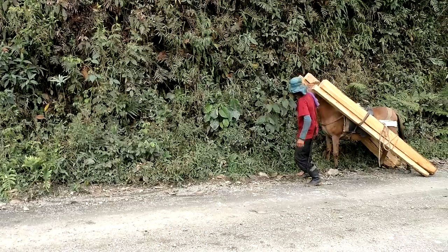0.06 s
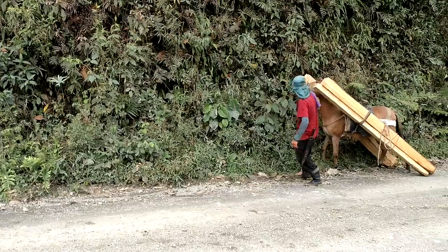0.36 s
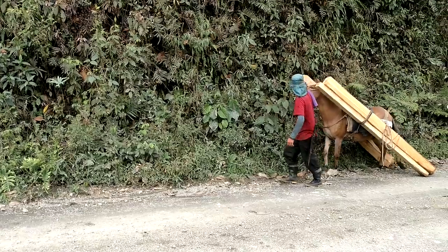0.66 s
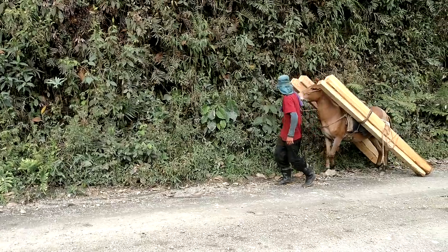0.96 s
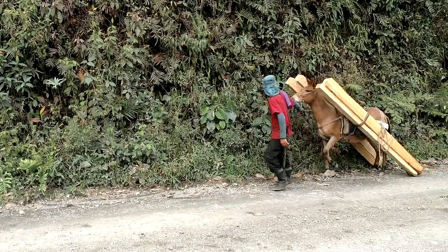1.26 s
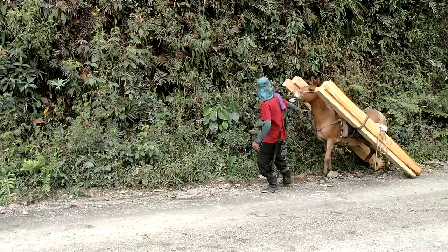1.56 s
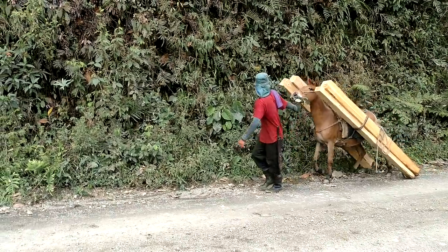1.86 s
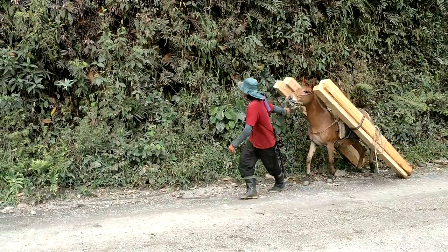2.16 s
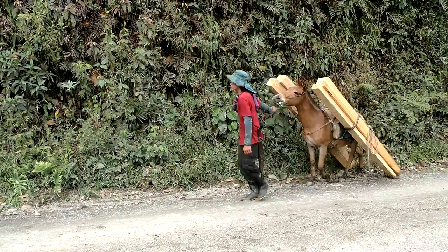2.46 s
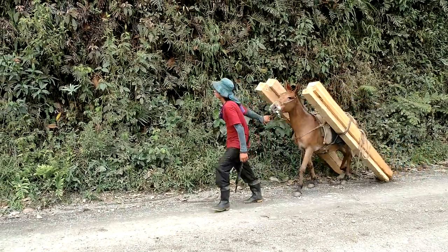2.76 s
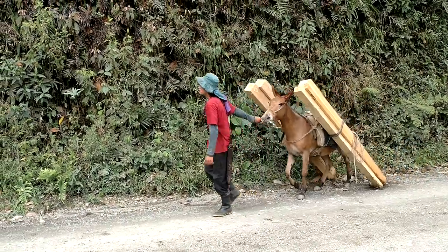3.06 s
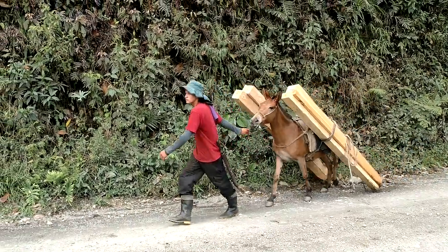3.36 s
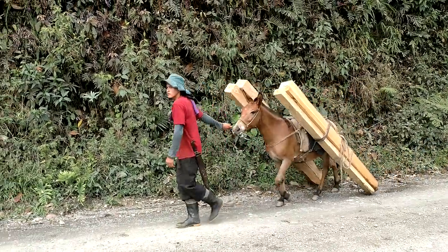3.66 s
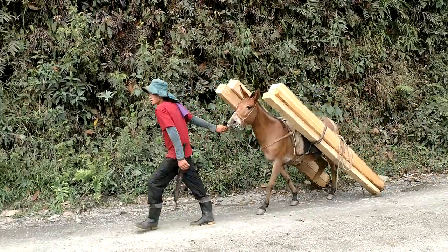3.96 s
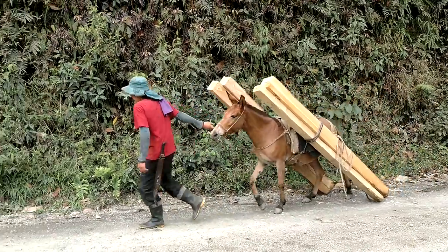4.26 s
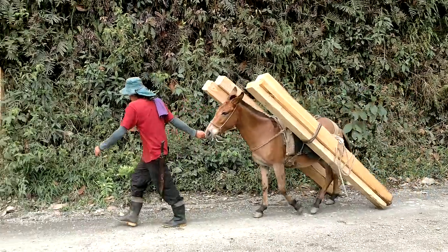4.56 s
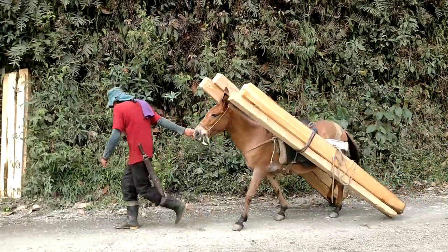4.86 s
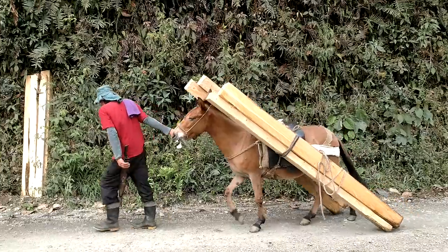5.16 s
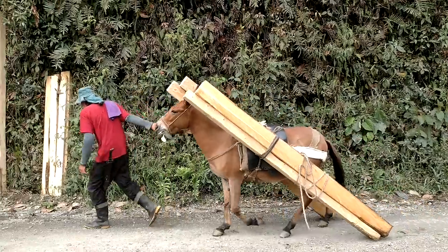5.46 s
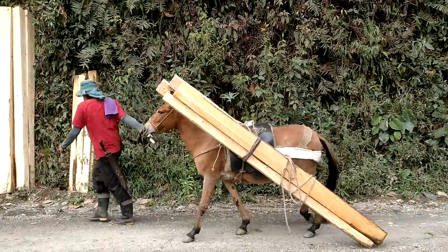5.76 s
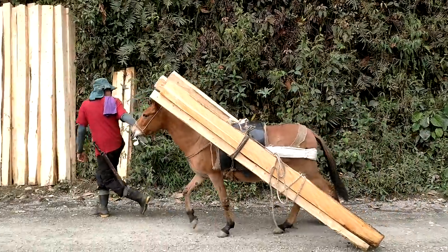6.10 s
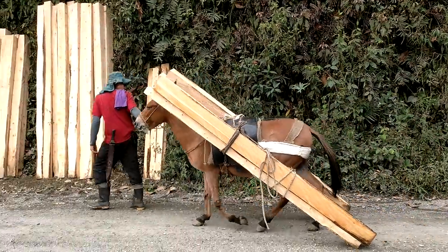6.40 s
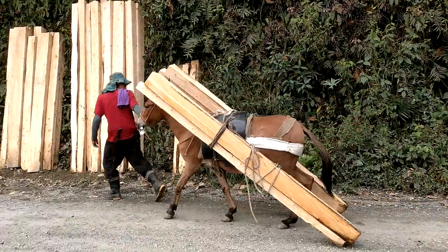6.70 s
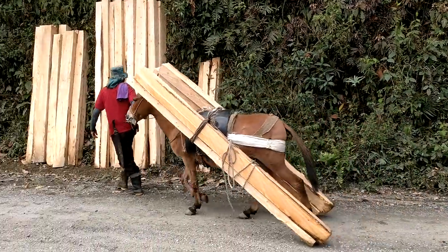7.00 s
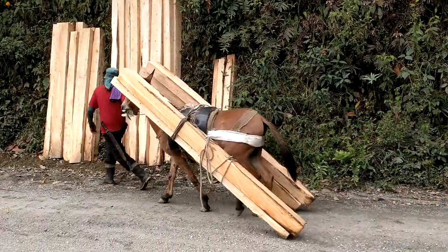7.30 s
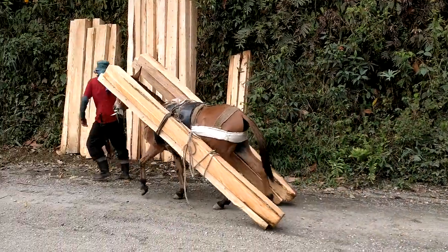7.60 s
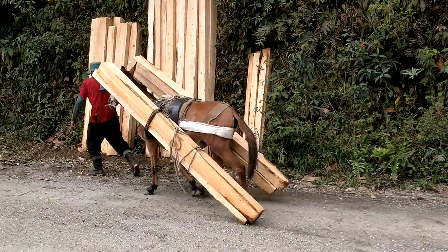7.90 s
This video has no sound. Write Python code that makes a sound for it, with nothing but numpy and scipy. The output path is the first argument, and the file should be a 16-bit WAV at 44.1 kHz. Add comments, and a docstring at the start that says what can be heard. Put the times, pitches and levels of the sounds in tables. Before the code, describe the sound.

Hooves and boots crunch on a gravel road as dragged timber scrapes past in surges, knocking hollowly, with low wind gusts.

```python
"""On a gravel road a mule, led by a man in boots, drags long sawn boards past at close range.
Friction is a train of tiny impacts: the board ends grind over the stones in surges, while hooves,
boots and lurching boards crunch and knock. Each blow excites the modes of the timber, which rings
hollowly. Turbulent gusts buffet the microphones."""
import sys
import numpy as np
from scipy import signal
from scipy.fft import rfft, irfft, next_fast_len
from scipy.io import wavfile
from scipy.ndimage import uniform_filter1d, map_coordinates

SR = 44100
rng = np.random.default_rng(int(sys.argv[2]) if len(sys.argv) > 2 else 0)


def wav_record(signal):
    """Record a signal, one row per channel, as 16-bit PCM in the file named by sys.argv[1]."""
    frames = np.transpose(np.atleast_2d(signal))
    bounded = np.clip(frames, -1, 1)
    # unit amplitude maps onto the largest positive 16-bit level
    quanta = np.round(bounded * 32767).astype(np.int16)
    wavfile.write(sys.argv[1], SR, quanta)


N = 358974

# modes of the lashed boards: frequency_hz, level_db, t60_s
BOARD_MODES = [(175.4, -5.5, 0.27), (314.6, 0, 0.17), (439.5, -6.5, 0.18), (614.4, 1.5, 0.08),
               (699.7, 1.5, 0.12), (792, -3, 0.059), (967, -5, 0.073), (1035.6, -0.5, 0.082),
               (1182, 4.5, 0.048), (1323, 9.5, 0.03), (1438, 7, 0.039), (1880, -1.5, 0.044)]
# spectrum of a hard knock on wood: frequency_hz, gain_db
KNOCK_SPECTRUM = [(100, -18.5), (300, -12.5), (520, -11), (700, -3.5), (1050, 6.5), (1420, 6.5), (1750, -2),
                  (2300, -5), (3300, -15), (6000, -67.5)]
# spectrum of stone striking stone: frequency_hz, gain_db
GRIT_SPECTRUM = [(400, -7), (1500, 5.5), (2600, 3), (3200, 5.5), (4050, 4), (5000, 0.5), (6000, -2.5),
                 (7700, -8), (10500, -1.5), (15500, -6.5)]
# approach of the load, which turns side-on as it nears: time_s, nearness_fraction
NEARNESS = [(0, 0.86), (3.2, 0.64), (5, 1), (6.3, 1)]


def drag(patches=48):
    """Friction as many small impacts: board ends plough through stones, which hiss and shake the wood."""
    # spectrum of wood grinding on gravel: frequency_hz, gain_db
    grind_spectrum = [(100, -19), (310, -4), (500, -7), (700, -3), (1050, 8), (1420, 3), (2300, -3.5),
                      (3300, -10.5), (6000, -59.5)]
    # fine sand under the boards, relative to the grit: time_s, level_db
    sand_levels = [(0, 6), (.5, -4), (1.3, -3), (2.7, 2), (4.8, -13), (8.1, -13.5)]
    grind_gain, grit_gain = hauling()
    sand_db, = curves(sand_levels)
    coarseness = np.clip(0.65 + 0.55 * curves(NEARNESS)[0], 0, 1.2)  # single stones stand out up close
    clumps = amp(1.8 * wobble(45, N)) * fractures(N, rate=45) ** coarseness
    contacts = stones(N, rate=800, spread_db=3.5, sand=0.75) * clumps
    wood, cracks = np.zeros(N), np.zeros((2, N))
    edges = np.linspace(0, N, patches + 1).astype(int)
    for start, end in zip(edges, edges[1:]):  # the point of contact keeps shifting
        patch = np.pad(contacts[:, start:end], ((0, 0), (0, SR // 4)))
        add(wood, start / SR, unit(through(patch[0], timber()), slice(end - start)))
        add(cracks, start / SR, unit(scatter(patch), slice(end - start)))
    grind = unit(through(wood, kernel(grind_spectrum)))
    grit = unit(through(cracks, kernel(GRIT_SPECTRUM)))
    grains = stones(N, rate=2800, spread_db=5.5, sand=1.0) * amp(2.0 * wobble(24.67, N))
    hiss = unit(through(grains, kernel([(2000, 9.9), (6000, 0.87), (9500, 6.1), (15500, 2.7)])))
    return grind_gain * grind, grit_gain * (grit + amp(sand_db) * hiss)


def hauling(creep_grind_db=0.5):
    """Friction noise follows the sliding: each pull lifts the grind and grit gains above a slow creep."""
    # surges of the mule: start_s, length_s, grind_db, grit_db
    pulls = [(0.457, 0.53, -47, -43.5), (0.914, 0.36, -39, -42.5), (1.468, 0.4, -35, -40.5),
             (2.088, 0.38, -36, -43.5), (2.468, 0.37, -38, -42.5), (3.004, 0.26, -36, -42),
             (3.557, 0.38, -41.5, -44.5), (4.028, 0.08, -37, -40.5), (4.22, 0.23, -41.5, -45),
             (4.8, 0.059, -37, -36.5), (5.197, 0.018, -26.5, -29.5), (5.362, 0.28, -35.5, -42.5),
             (5.742, 0.087, -31.5, -35.5), (5.974, 0.384, -33, -38.5), (6.38, 0.37, -40.5, -46),
             (7.172, 0.05, -34, -39), (7.233, 0.21, -31, -38), (7.495, 0.2, -34, -38.5),
             (7.79, 0.16, -44.5, -46.5), (8.076, 0.087, -30.5, -36)]
    # creeping boards and trickling stones between pulls: time_s, grit_db
    creep_levels = [(0, -52.5), (2, -43), (3.5, -47), (4.7, -52), (6.5, -53.5), (8.14, -53.5)]
    creep = amp(curves(creep_levels)[0])
    grind, grit = creep * amp(creep_grind_db), creep
    for start, length, grind_db, grit_db in pulls:
        pull = swell(start, length, attack_s=0.0096, release_s=0.056)
        grind = np.maximum(grind, amp(grind_db) * pull)
        grit = np.maximum(grit, amp(grit_db) * pull)
    return grind, grit


def stones(n, rate, spread_db, sand):
    """Shot noise: uneven impacts, rate per second, over sand; two channels share their times and sizes."""
    hits = rng.random(n) < rate / SR
    sizes = amp(spread_db * np.minimum(rng.exponential(size=n), 4))
    signs = rng.choice([-1, 1], (2, n))
    return unit(hits * sizes * signs) + sand * rng.standard_normal((2, n))


def fractures(n, rate, t60=0.015):
    """Brittle fracture: a stone gives way at random, and the gain of the contacts flares and decays."""
    flares = (rng.random(n) < rate / SR) * np.minimum(rng.exponential(size=n), 1.5)
    return 1 + 2 * through(flares, amp(-60 * np.arange(SR // 20) / SR / t60))


def timber(rattle_db=9, rattle_t60=0.058, direct=10, detune=0.022):
    """Modal impulse response: each contact weights and detunes the modes anew, over a dense rattle."""
    t = np.arange(SR // 4) / SR
    hz, db, t60 = np.transpose(BOARD_MODES)[:, :, None]
    hz = hz * (1 + detune * np.minimum(hz / 1000, 1) * rng.standard_normal(hz.shape))
    strength = amp(db + 2.9 * rng.standard_normal(hz.shape)) * rng.choice([-1, 1], hz.shape)
    ring = np.sum(strength * amp(-60 * t / t60) * np.sin(2 * np.pi * hz * t), axis=0)
    rattle = rng.standard_normal(len(t)) * amp(-60 * t / rattle_t60)
    rattle[0] += direct
    return ring + 4 * amp(rattle_db) * rattle


def contact(hz, db, half_width_octaves=0.39):
    """Contact resonance: the point of impact boosts a broad band around its own pitch."""
    ratio = 2 ** half_width_octaves
    return kernel([(hz / ratio, 0), (hz, db), (hz * ratio, 0)])


def scatter(x, t60=0.018, wet=0.6):
    """Scattering off the road and the load gives each crack a brief diffuse tail."""
    t = np.arange(SR // 16) / SR
    tail = rng.standard_normal(len(t)) * amp(-60 * t / t60)
    return x + wet * through(x, tail / np.linalg.norm(tail))


def stone_resonances(x, depth_db, frame=256):
    """Every stone has its own natural frequency, so the spectrum changes from moment to moment."""
    spectra = signal.stft(x, nperseg=frame)[2]
    ripple = uniform_filter1d(rng.standard_normal(spectra.shape[1:]), size=5, axis=0)
    ripple = uniform_filter1d(ripple, size=4, axis=1)
    coloured = signal.istft(spectra * amp(depth_db * unit(ripple)), nperseg=frame)[1][:, :N]
    return coloured * np.std(x) / np.std(coloured)


def crunches(snap_s=0.0032, settle_db=-24, settle_t60=0.21, grit_lead_s=0.002):
    """Granular collapse: stones yield ever harder under a weight, the wood thuds, loose grit settles."""
    # steps and lurches of the load: peak_s, rise_s, thump_db, knock_db, grit_db, pitch_hz
    impacts = [(1.213, 0.004, -71, -28, -41, 1120), (1.296, 0.0094, -64, -26, -32.5, 1100),
               (1.331, 0.037, -47, -19, -24.5, 1130), (1.836, 0.021, -44, -20.5, -33, 1000),
               (1.955, 0.022, -30.5, -28, -34, 1020), (2.211, 0.0062, -60, -23, -36, 1040),
               (2.224, 0.0029, -56, -26.5, -34.5, 1010), (2.416, 0.0063, -45, -34.5, -30.5, 1060),
               (3.255, 0.01, -40, -20, -29.5, 1340), (3.568, 0.014, -22, -22, -32.5, 1300),
               (3.794, 0.025, -31.5, -27.5, -33.5, 1110), (3.888, 0.0047, -53, -28.5, -34.5, 1090),
               (3.908, 0.0036, -33, -25.5, -38, 1000), (3.922, 0.0098, -24, -31, -46, 970),
               (4.082, 0.0032, -41, -27, -42, 1320), (4.252, 0.0086, -30, -31.5, -34, 1410),
               (4.267, 0.021, -26.5, -26, -39, 1450), (4.298, 0.026, -26, -22.5, -32.5, 1370),
               (4.81, 0.018, -40, -33, -37, 1240), (4.967, 0.018, -31.5, -23, -26, 1030),
               (5.224, 0.022, -35, -24.5, -27, 975), (5.396, 0.0088, -70, -27, -38.5, 1680),
               (5.441, 0.019, -62, -28, -28, 1390), (5.52, 0.062, -56, -27.5, -31, 810),
               (5.653, 0.012, -38, -23.5, -34, 755), (5.821, 0.01, -52, -29, -28.5, 715),
               (5.97, 0.0037, -54, -25.5, -37, 1350), (6.001, 0.045, -34, -28.5, -31, 1390),
               (6.211, 0.018, -56, -25, -31.5, 1120), (6.319, 0.011, -54, -20.5, -32, 1290),
               (6.337, 0.012, -35, -16, -24.5, 1200), (6.359, 0.0037, -54, -17.5, -24, 1350),
               (6.475, 0.014, -58, -17, -25, 1210), (6.662, 0.017, -70, -22, -35.5, 1180),
               (7.01, 0.023, -31.5, -27, -30, 810), (7.592, 0.0067, -40, -18.5, -33.5, 1420),
               (7.682, 0.047, -38.5, -26.5, -57, 1470), (7.912, 0.016, -37.5, -18.5, -23.5, 1410)]
    # spectrum of a heavy thump: frequency_hz, gain_db
    thump_spectrum = [(60, -36), (160, -8), (310, -3.5), (520, -5.5), (850, 0), (1150, 3), (1550, -18),
                      (2200, -45)]
    wood, grit = np.zeros(N), np.zeros((2, N))
    t = np.arange(-SR // 10, SR // 4) / SR
    core = (t > -0.015) & (t < 0.025)
    heavy, hard, gritty = kernel(thump_spectrum), kernel(KNOCK_SPECTRUM), kernel(GRIT_SPECTRUM)
    for peak_s, rise_s, thump_db, knock_db, grit_db, pitch_hz in impacts:
        fall_s = snap_s + 0.59 * rise_s
        force = amp(-11 * np.where(t < 0, np.abs(t / rise_s) ** 1.69, t / fall_s))
        force += (t > 0) * amp(settle_db - 60 * np.abs(t) / settle_t60)
        force *= fractures(len(t), rate=100) ** 0.73
        contacts = force * stones(len(t), rate=2400, spread_db=3.5, sand=0.19)
        contacts[:, np.searchsorted(t, 0)] += 2 + 0.026 / rise_s  # a faster landing stops harder
        ring = through(contacts[0], timber(rattle_db=9.5, rattle_t60=0.061))
        thump = amp(thump_db) * unit(through(ring, heavy), core)
        knock = amp(knock_db) * unit(through(through(ring, hard), contact(pitch_hz, db=7)), core)
        add(wood, peak_s + t[0], thump + knock)
        split = 1 + 0.59 * (t >= 0) * np.exp(-np.abs(t) / snap_s)  # a stone splits as the wood lands
        crunch = unit(through(scatter(split * contacts), gritty), core)
        add(grit, peak_s + t[0] - grit_lead_s, amp(grit_db) * crunch)
    return wood, grit


def pebbles(crack_t60=0.006, tap_hz=1037):
    """Impulsive excitation: a lone stone cracks free and taps the wood."""
    # stones flicked against the boards: start_s, knock_db, grit_db
    flicks = [(0.124, -49, -48), (0.535, -39.5, -51), (0.724, -49.5, -45), (1.049, -35, -40.5),
              (1.468, -37.5, -42), (1.685, -30.5, -45), (1.759, -31, -42.5), (2.348, -31, -56),
              (2.496, -32.5, -55), (2.562, -36.5, -43), (3.163, -39.5, -36), (3.644, -33.5, -36),
              (3.994, -42, -40), (4.389, -39, -44), (4.403, -30, -46), (4.605, -46, -36.5),
              (4.779, -46, -47), (4.842, -46, -44), (5.045, -40.5, -50), (5.068, -41.5, -50),
              (5.581, -34, -42), (5.845, -33.5, -48), (6.596, -35.5, -44.5), (6.797, -41.5, -56),
              (6.927, -31.5, -44), (7.367, -38, -53), (7.411, -34.5, -38), (7.732, -36.5, -68),
              (7.752, -37, -60), (7.846, -39.5, -62)]
    wood, grit = np.zeros(N), np.zeros((2, N))
    t = np.arange(SR // 5) / SR
    core = slice(SR // 25)
    hard = kernel(KNOCK_SPECTRUM)
    gritty = through(kernel(GRIT_SPECTRUM), contact(hz=11200, db=7.5))  # small stones snap higher
    for start_s, knock_db, grit_db in flicks:
        crack = stones(len(t), rate=3300, spread_db=7, sand=0.19) * amp(-60 * t / crack_t60)
        tap = through(through(crack[0], timber(rattle_db=11.0, rattle_t60=0.035)), hard)
        add(wood, start_s, amp(knock_db) * unit(through(tap, contact(tap_hz, db=5.0)), core))
        add(grit, start_s, amp(grit_db) * unit(through(scatter(crack, wet=0.68), gritty), core))
    return wood, grit


def slam(start_s=4.609, level_db=-16, bounce_s=0.0052, loss_db=6, count=5):
    """Inelastic bouncing: one board drops flat on the others and chatters, and the bundle rings on."""
    # spectrum of the blunt blow: frequency_hz, gain_db
    blow_spectrum = [(100, -15), (330, 3), (1300, 1), (1750, -13), (2500, -37)]
    track, blows = np.zeros(N), np.zeros(SR // 4)
    for k, late in enumerate(rng.random(count)):
        add(blows, bounce_s * (k + late / 2) * (k > 0), amp([-loss_db * k]))
    ring = through(blows, timber(rattle_db=1, rattle_t60=0.11, direct=26))
    ring = through(ring, kernel(blow_spectrum))
    add(track, start_s, amp(level_db) * unit(ring, slice(SR // 25)))
    return track


def booms(attack_s=0.023, t60=0.14):
    """Resonance: a soft push from the swaying load swells the strongest low mode of the boards."""
    # sways of the load: start_s, peak_db
    sways = [(3.919, -22), (5.531, -23.5), (5.984, -23.5), (7.234, -31.5)]
    track, t = np.zeros(N), np.arange(SR // 4) / SR
    hz = BOARD_MODES[1][0]
    envelope = np.minimum(t / attack_s, 1) * amp(-60 * np.maximum(t - attack_s, 0) / t60)
    for start_s, peak_db in sways:
        phase = 2 * np.pi * hz * t + 0.41 * wobble(69, len(t))
        add(track, start_s, amp(peak_db) * envelope * np.sin(phase))
    return track


def turning(wood):
    """Directivity: the timber's spectrum changes as its side swings toward the microphones."""
    # radiation ahead of the load: frequency_hz, gain_db
    ahead = [(650, -0.5), (1050, 3), (1550, -9.5), (2100, 9.5), (3400, -28)]
    # radiation to the side: frequency_hz, gain_db
    abeam = [(700, 6), (1050, -3), (1500, -2), (3000, 6.5)]
    near = np.clip(curves(NEARNESS)[0], 0, 1)
    return (1 - near) * through(wood, kernel(ahead)) + near * through(wood, kernel(abeam))


def wind(eddy_db=3.5, flutter_db=-12, flutter_growth=1.23, right_db=-1.3, incoherent_db=-25):
    """Turbulent pressure drives the two channels in antiphase; harder gusts carry more flutter."""
    # spectrum of the low buffeting: frequency_hz, gain_db
    buffet_spectrum = [(25, -27), (65, 0), (110, 2), (180, -9.5), (260, -17), (400, -28.5), (1500, -59)]
    # spectrum of the higher flutter: frequency_hz, gain_db
    flutter_spectrum = [(50, -26), (130, 7), (230, 0), (450, -15.5), (1500, -71)]
    db = wind_db()
    eddies = amp(eddy_db * wobble(24, N))
    rumble = unit(eddies * through(rng.standard_normal((2, N)), kernel(buffet_spectrum)))
    puffs = amp(3.0 * wobble(40, N))
    flutter = unit(eddies * puffs * through(rng.standard_normal(N), kernel(flutter_spectrum)))
    flutter *= amp(db.max() + flutter_db + flutter_growth * (db - db.max()))
    push = amp(db - 4) * rumble[0]
    slap = eddy_slaps()
    left = push + flutter + slap
    right = -amp(right_db) * push - 0.034 * flutter - 0.62 * slap
    return np.array([left, right]) + amp(db + incoherent_db) * rumble[1]


def wind_db():
    """Unsteady flow: the wind level is that of the strongest gust or of the breeze beneath."""
    # gusts on the microphones: start_s, length_s, level_db
    gusts = [(0.25, 0.2, -24.5), (0.449, 0.32, -15.5), (0.875, 0.018, -13), (0.984, 0.16, -14),
             (1.482, 0.53, -27), (2.28, 0.29, -23.5), (2.645, 0.33, -19), (4.007, 0.39, -19.5),
             (4.888, 0.19, -25), (5.68, 0.6, -23), (6.23, 0.08, -16.5), (7.558, 0.22, -29)]
    # light breeze that drops toward the end: time_s, level_db
    breeze = [(1.4, -32.5), (6.2, -32), (6.9, -51), (8.14, -53)]
    gains = [amp(db) * swell(start, length, attack_s=0.078, release_s=0.047)
             for start, length, db in gusts]
    return 20 * np.log10(np.max([amp(curves(breeze)[0]), *gains], axis=0))


def eddy_slaps(cycles=0.81):
    """Pressure transients: an eddy hits the microphone port, and the swing dies within a few cycles."""
    # single eddies: start_s, peak_db, nominal_hz
    eddies = [(0.241, -11.5, 99), (0.695, -5.5, 118), (0.739, -7.5, 165), (0.854, -5.5, 146),
              (0.871, -9, 288), (0.897, -8, 109), (1.006, -9, 128), (1.107, -0.5, 198), (2.667, -12, 115),
              (2.703, -8, 170), (2.804, -19, 190), (2.906, -9.5, 117), (4.498, -5.5, 134),
              (4.543, -4.5, 130), (6.268, -13, 104)]
    track, t = np.zeros(N), np.arange(SR // 10) / SR
    for start_s, peak_db, hz in eddies:
        age = hz * t / cycles
        phase = 2 * np.pi * np.cumsum(hz * (0.79 + 0.63 * np.exp(-age))) / SR  # slowing as it passes
        envelope = 2 * age * np.exp(1 - 2 * age)
        add(track, start_s, amp(peak_db) * envelope * np.sin(phase))
    return track


def air(db=-55):
    """Broadband ambient noise: the faint rush of the hillside."""
    # spectrum of the open air: frequency_hz, gain_db
    air_spectrum = [(25, -21), (110, -1), (1500, -10), (7000, -26), (16000, -62)]
    return amp(db) * unit(through(rng.standard_normal((2, N)), kernel(air_spectrum)))


def microphones(wood, grit):
    """Stereo coherence: the pair hears timber alike, grit partly so, with phase and level differences."""
    # phase by which left leads right: frequency_hz, lead_rad
    phase_lead = [(1150, 0), (1480, .3), (1800, 1.9), (2100, 3), (2380, 3.25), (3200, 6.1), (4350, 9.4),
                  (5400, 12.4), (6450, 9.4), (8200, 2.9), (9400, 0), (16000, -11)]
    # level of left over right: frequency_hz, difference_db
    level_difference = [(100, -14), (500, 3), (1100, 0), (1450, 4), (1750, 2.5), (2500, -0.5), (4000, 1),
                        (7500, 1.5), (9000, 5.5), (11000, 11.5), (16000, 7.5)]
    # likeness of the grit in both channels: frequency_hz, coherence_fraction
    coherence = [(2300, 0.99), (2800, 0.4), (3300, 0.54), (3850, 0.46), (4350, 1), (4900, 0.49),
                 (5400, 0.77), (5900, 0.13), (6400, 0.99), (9000, 0.035), (15000, 0.15)]
    size = next_fast_len(N + SR // 4)
    hz = np.fft.rfftfreq(size, 1 / SR)
    body = rfft(wood, size)
    shared, separate = rfft(grit, size)
    alike = np.clip(along(coherence, hz), 0, 1)
    pair = np.array([body + shared, body + alike * shared + np.sqrt(1 - alike ** 2) * separate])
    tilt = amp(along(level_difference, hz))
    lag = np.exp(-1j * along(phase_lead, hz))
    equal_power = np.sqrt(2 / (1 + tilt ** 2))
    return irfft(pair * np.array([tilt, lag]) * equal_power, size)[:, :N]


def amp(db):
    """Decibels to amplitude gain."""
    return 10 ** (np.asarray(db) / 20)


def unit(x, part=slice(None)):
    """Normalise so that the given part has rms 1."""
    return x / np.sqrt(np.mean(x[..., part] ** 2) + 1e-20)


def along(points, hz):
    """Interpolate (frequency_hz, value) points on a log frequency axis."""
    knots_hz, values = np.transpose(points)
    return np.interp(np.log(hz + 1), np.log(knots_hz + 1), values)


def curves(rows):
    """Interpolate each column after the time to one value per sample."""
    times, *columns = np.transpose(rows)
    return [np.interp(np.arange(N) / SR, times, column) for column in columns]


def wobble(rate, n, step=32):
    """Smooth random modulation with rate knots per second."""
    grid = np.arange(0, n, step)
    coarse = map_coordinates(rng.standard_normal(int(n * rate / SR) + 4), [grid * rate / SR])
    return np.interp(np.arange(n), grid, coarse)


def swell(start_s, length_s, attack_s, release_s):
    """Envelope: a quadratic rise up to the start, a hold, an exponential decay."""
    t = np.arange(N) / SR - start_s
    rise = np.clip(1 + t / attack_s, 0, 1)
    return rise ** 2 * np.exp(-np.maximum(t - length_s, 0) / release_s)


def kernel(points, size=4096):
    """Minimum-phase impulse response for a spectrum of (frequency_hz, gain_db) points."""
    cepstrum = irfft(np.log(amp(along(points, np.fft.rfftfreq(size, 1 / SR)))))
    cepstrum[1:size // 2] *= 2
    cepstrum[size // 2 + 1:] = 0
    return irfft(np.exp(rfft(cepstrum)))


def through(x, response):
    """Convolve every channel, keeping the length."""
    return signal.fftconvolve(x, response[None] if x.ndim > 1 else response, axes=-1)[..., :x.shape[-1]]


def add(track, start_s, sound):
    """Superpose a sound on the track from the given time."""
    start = max(round(start_s * SR), 0)
    piece = sound[..., :max(N - start, 0)]
    track[..., start:start + piece.shape[-1]] += piece


def scene():
    """Superposition: timber, gravel and open air sum at the microphones, and the wind adds its pressure."""
    grind, hiss = drag()
    thuds, crunch = crunches()
    taps, cracks = pebbles()
    rasp = stone_resonances(grind[None], depth_db=1.8, frame=512)[0]
    wood = turning(rasp + thuds + taps) + slam() + booms()
    grit = hiss + stone_resonances(crunch, depth_db=4.0, frame=128) + cracks
    return microphones(wood, grit + air()) + wind()


def record(dry, ceiling=0.92, bottom_hz=38, top_hz=16050):
    """Clipping and band limiting: peaks flatten near full scale; deep bass and top treble are cut."""
    size = next_fast_len(N + SR // 4)
    hz = np.fft.rfftfreq(size, 1 / SR)
    low_cut = hz ** 3 / np.hypot(hz ** 3, bottom_hz ** 3)
    clipped = np.clip(dry, -ceiling, ceiling)
    return irfft(rfft(clipped, size) * low_cut * (hz < top_hz), size)[:, :N]


dry = scene()
out = record(dry)
wav_record(out)
```